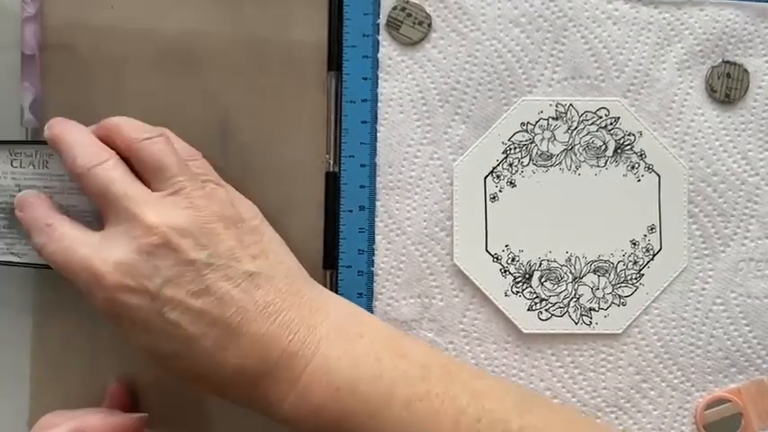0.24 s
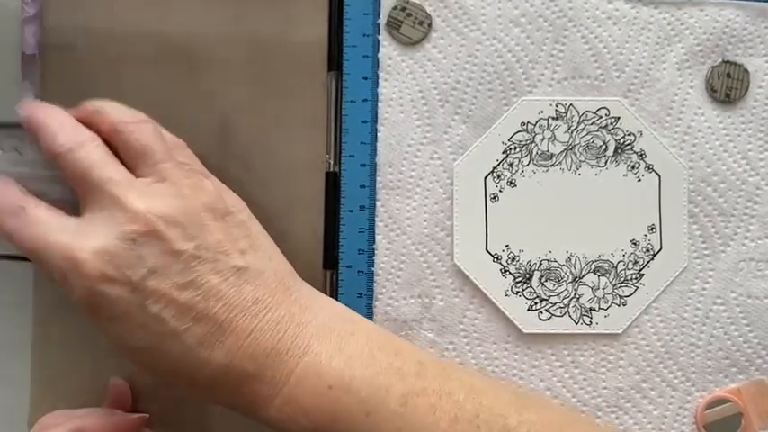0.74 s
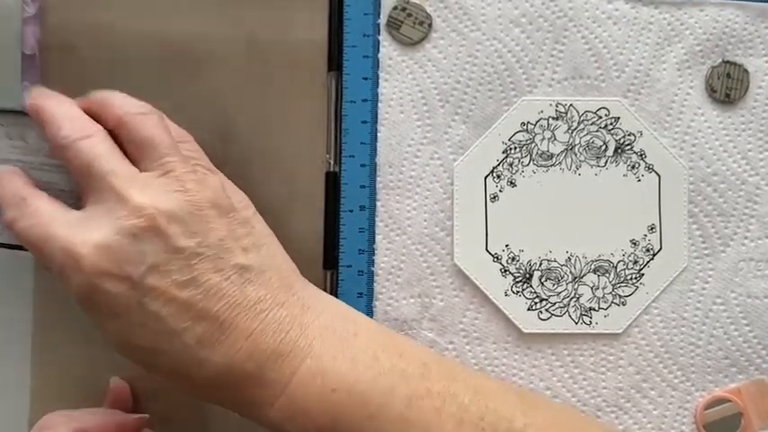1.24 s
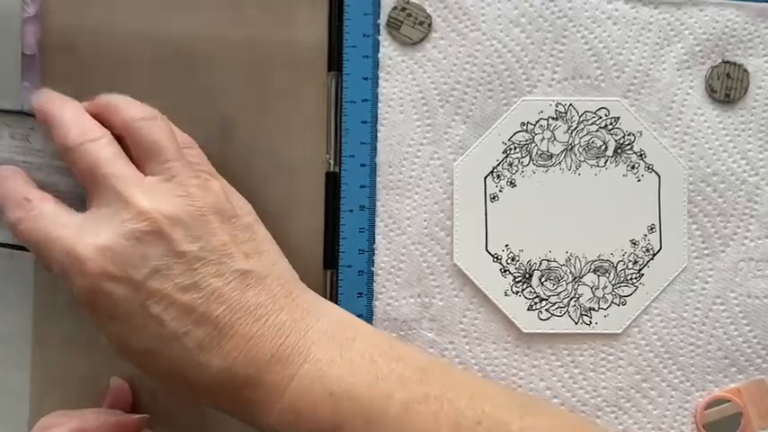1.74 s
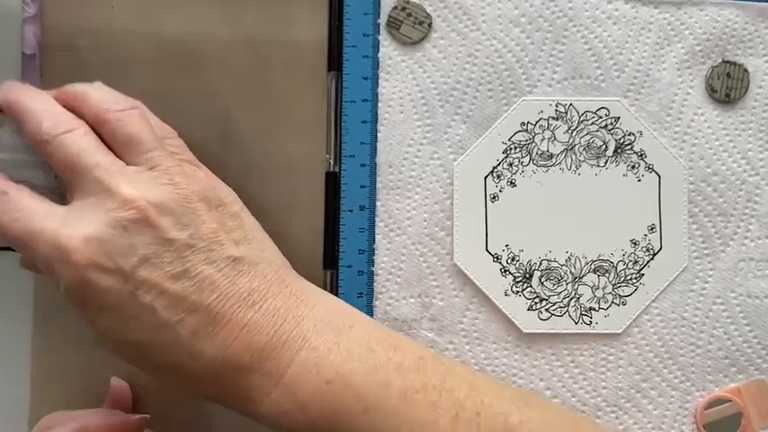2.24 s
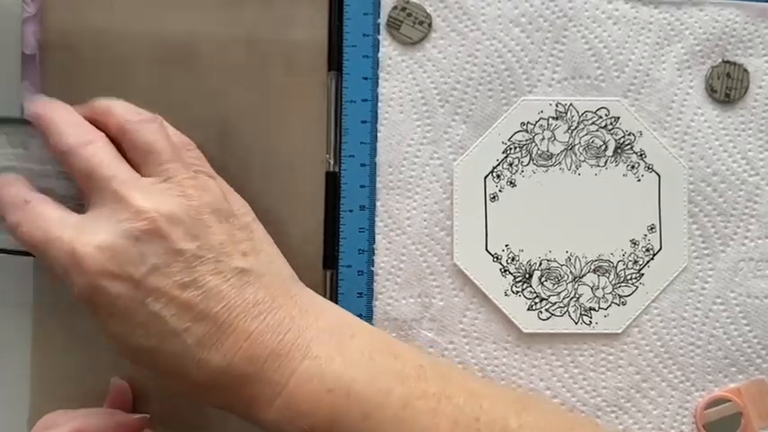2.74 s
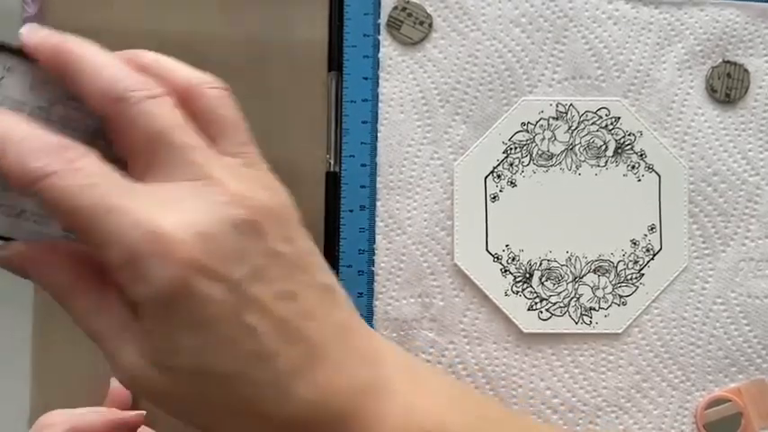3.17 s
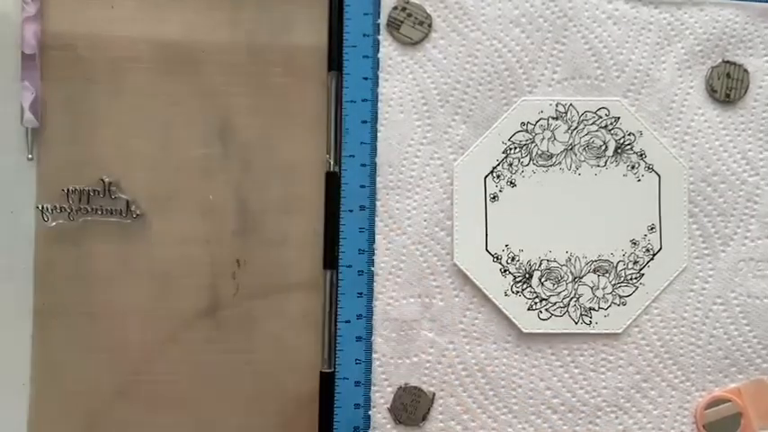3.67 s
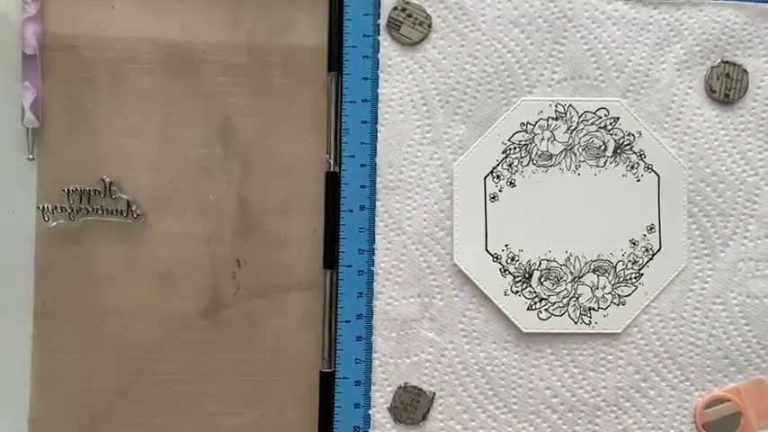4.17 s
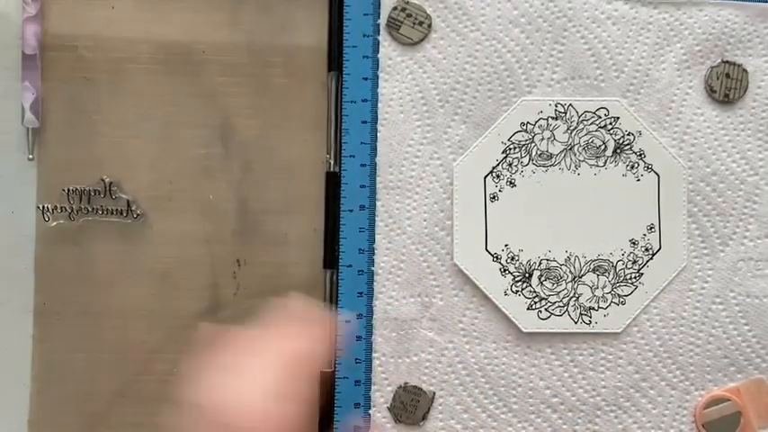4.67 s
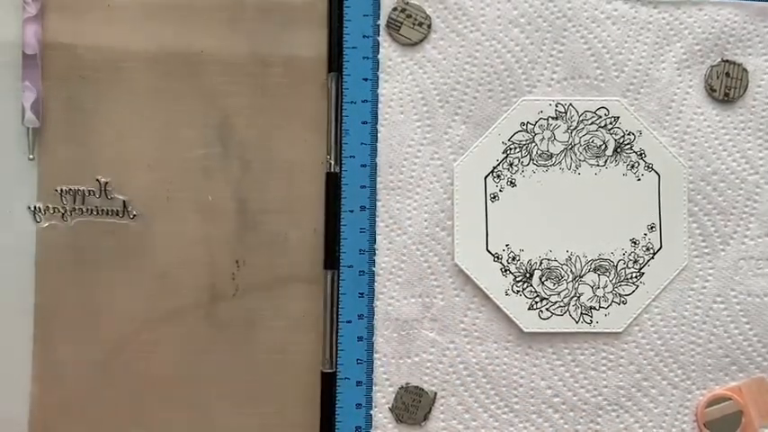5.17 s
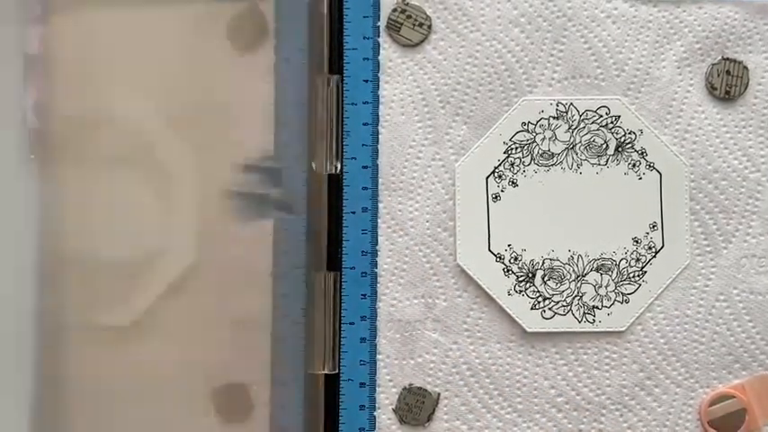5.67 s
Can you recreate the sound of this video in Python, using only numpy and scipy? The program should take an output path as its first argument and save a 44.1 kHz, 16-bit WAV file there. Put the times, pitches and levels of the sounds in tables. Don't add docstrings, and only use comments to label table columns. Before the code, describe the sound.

In a small quiet room, close above a table, an ink pad pats a stamp on an acrylic plate: six uneven pairs of dull, low thumps, usually stronger then weaker. Then a thin plastic case clicks, snaps shut and is set down. Finally the hinged plate takes two hard knocks, the second loudest, with a short creak between them and a dying rattle after.

```python
import sys
import numpy as np
from scipy import signal
from scipy.fft import rfft, irfft, next_fast_len
from scipy.io import wavfile
from scipy.ndimage import uniform_filter1d

SR = 44100
rng = np.random.default_rng(int(sys.argv[2]) if len(sys.argv) > 2 else 0)


def output_pcm(signal):
    pcm = np.clip(np.atleast_2d(signal).T, -1, 1) * 32767
    wavfile.write(sys.argv[1], SR, np.round(pcm).astype(np.int16))


def attenuation_scalar(level_db):
    decades = np.asarray(level_db, float) / 20
    return 10 ** decades


N = 260631
SIZE = 2 ** 14
LONG = next_fast_len(N)

# frequency_hz, level_db (per Hz)
TAP_COLOUR = [(48, -20), (100, 3), (168, 3.5), (210, 0), (296, -1), (450, -11), (572, -5.5), (910, -13),
              (1700, -11.5), (2300, -13.5), (3100, -19.5), (4300, -28), (6000, -33.5), (15500, -47)]
# frequency_hz, level_db, t60_s
TAP_MODES = [(100.05, 0.5, 0.63), (236.3, 6, 0.16), (293.96, 2.5, 0.15), (574.85, 10, 0.1062),
             (71.2, -2, 0.36), (1159.4, 4.5, 0.0624), (2366.5, 2, 0.09)]
# frequency_hz, t60_s
TAP_DECAY = [(60, 0.1383), (150, 0.032), (500, 0.267), (2000, 0.1957), (6000, 0.3), (14000, 0.03)]


def taps():
    # start_s, level_db, tilt_db (per octave)
    pad_hits = [(0.266, -22.5, 0.6), (0.48, -28, 0.06), (0.84, -26.5, 0.13), (1.041, -32, 0.45),
                (1.3496, -22.5, 1.02), (1.538, -35, -0.53), (1.848, -26, 0.5), (2.043, -31, 0.7),
                (2.374, -26, 0.51), (2.553, -32.5, 0.5853), (2.84, -25.5, 0.53), (3.027, -26.5, 0.5),
                (3.372, -51, 1.14)]
    damping = 0.8264
    out = np.zeros(N)
    same = rng.standard_normal(SIZE)
    for start_s, level_db, tilt_db in pad_hits:
        noise = same + 0.834 * rng.standard_normal(SIZE)
        hit = blow(noise, TAP_COLOUR, TAP_MODES, TAP_DECAY, tilt_db, damping,
                   direct_db=-11, direct_tilt_db=-3.5, modes_db=-6, lag=0.33)
        add(out, start_s, level_db, hit)
        touch = np.diff(rng.standard_normal(180)) * np.linspace(0, 1, num=179)
        add(out, start_s - 0.003, level_db - 26.5, touch)
    return out * attenuation_scalar(-3.0)


def thuds():
    # start_s, level_db
    nudged = [
        (3.838, -49),
        (3.938, -50),
        (4.44, -49.5),
    ]
    out = np.zeros(N)
    for start_s, level_db in nudged:
        hit = blow(rng.standard_normal(SIZE), TAP_COLOUR, TAP_MODES, TAP_DECAY, 2.48, 0.93,
                   direct_db=-14, direct_tilt_db=-0.88, modes_db=-37, lag=0.11)
        add(out, start_s, level_db, hit)
    return out * attenuation_scalar(-3.0)


def clacks():
    # start_s, level_db, decay_factor, lowest_ring_hz, top_db
    hard = [
        (3.838, -25.5, 0.96, 1641, 10),
        (3.939, -13, 1.182, 868.8, 5.5),
        (4.425, -30.5, 0.97, 992, -8),
        (4.435, -16.5, 1.054, 807.6, -7.5),
        (4.803, -38.5, .25, 1500, -11.5),
    ]
    # start_s, level_db, decay_factor, lowest_ring_hz, top_db
    soft = [(3.709, -31, 1.95, 1776, -20.5), (3.787, -43, 1.64, 1553, -36), (3.848, -30, 1.23, 2088, -40.5),
            (3.882, -30, 0.87, 1200, -11.5), (3.918, -36.5, 2.3, 1113, -4.5), (3.946, -22.5, 1.35, 767, -4),
            (4.136, -45, 2.88, 2130, -14), (4.257, -50, 2.1, 974, 14), (4.404, -48, 1.8, 935, 7),
            (4.443, -24.5, 2.1, 731, -3), (4.588, -61.5, 1.1, 2720, -11.5)]
    # tilt_db (per octave), slope_db (per octave squared)
    hard_tilt = (0.19, -5)
    soft_tilt = (-0.97, 0.49)
    # frequency_hz, level_db (per Hz)
    case_colour = [(150, -50), (250, 7), (360, -5), (421, -17.5), (475, 2.5), (857, 2), (984, 1),
                   (1840, -7.5), (2340, -8), (3040, -13), (3680, -8.5), (5120, -15.5), (6640, -22),
                   (12400, -30.5), (15800, -42)]
    # multiple, level_db, t60_s
    case_modes = [(1.01, 5.5, 0.061), (1.4, -11.5, 0.03), (2.3, -22, .02)]
    # frequency_hz, level_db, t60_s
    wall_rings = [(2740, -14.5, 0.052), (3634, -30, 0.043), (4156, -19, .05), (4833, -19, 0.045)]
    # frequency_hz, t60_s
    case_decay = [(300, 0.13), (1000, 0.041), (4000, 0.11), (5800, 0.27), (7000, .07), (14000, 0.087)]
    out = np.zeros(N)
    for contacts, direct_db, (base_db, slope_db) in ((hard, -8, hard_tilt), (soft, -25, soft_tilt)):
        for start_s, level_db, factor, ring_hz, top_db in contacts:
            tilt_db = base_db + slope_db * np.log2(ring_hz / 1000)
            modes = [(multiple * ring_hz, db, t60) for multiple, db, t60 in case_modes] + wall_rings
            hit = blow(rng.standard_normal(SIZE), case_colour, modes, case_decay, tilt_db, factor,
                       direct_db, direct_tilt_db=2.6, modes_db=-0.041, lag=0.031,
                       low_hz=0.838 * ring_hz, top_db=top_db)
            add(out, start_s, level_db, hit)
    return out * attenuation_scalar(-11)


def knocks():
    # start_s, level_db, tilt_db (per octave), decay_factor, direct_db
    blows = [
        (4.884, -8, 2.1643, 0.53, -6.5),
        (4.895, -14.5, -5, 0.27, -46.5),
        (5.149, -4, 3, 0.37, -7.5),
        (5.159, -7.5, -3, .5, -28.5),
        (5.176, -17, -0.5, .6, -39.5),
    ]
    # start_s, level_db
    rattle = [(5.05, -30), (5.066, -32.5), (5.218, -28), (5.249, -34.5), (5.287, -34), (5.327, -40),
              (5.359, -40), (5.392, -46), (5.43, -44.5), (5.467, -49), (5.489, -47), (5.543, -51),
              (5.627, -54), (5.719, -57)]
    # frequency_hz, level_db (per Hz)
    plate_colour = [(35, -55), (60, -35), (200, -17), (388, -1.5), (550, -10), (711, -2), (856, -14),
                    (1330, -14), (1570, -16.5), (1890, -20), (3810, -30.5), (5530, -30), (6670, -38),
                    (15800, -55.5)]
    # frequency_hz, level_db, t60_s
    edge_modes = [(285, -6, .08), (395, -5.5, 0.073), (677.7, 0.5, 0.067), (760, -4.5, 0.061),
                  (1340.6, -7, 0.088), (1810, -6, 0.03), (2540, -12, .02)]
    # frequency_hz, level_db, t60_s
    plate_modes = [(279.6, 1, .09), (403.4, 3, 0.033), (499, -3.5, 0.19), (677, -1.5, .06),
                   (725, 0.74, 0.15), (790, -5, 0.049), (982, -9, .06), (1383, -7, .07), (1780, -10.5, .05)]
    # frequency_hz, t60_s
    plate_decay = [(100, 0.17), (300, 0.19), (700, 0.1), (2000, 0.11), (5000, 0.077), (12000, 0.079)]
    chatter = [(start_s, level_db, -2.61, 0.99, -34) for start_s, level_db in rattle]
    groups = ((blows[:2], edge_modes, -7), (blows[2:], plate_modes, -9), (chatter, plate_modes, -22))
    out = np.zeros(N)
    for contacts, modes, top_db in groups:
        for start_s, level_db, tilt_db, factor, direct_db in contacts:
            hit = blow(rng.standard_normal(SIZE), plate_colour, modes, plate_decay, tilt_db, factor,
                       direct_db - 6, direct_tilt_db=-1.1, modes_db=0.6, lag=0.1326,
                       low_hz=220, top_db=top_db)
            add(out, start_s, level_db, hit)
    return out * attenuation_scalar(-6.0)


def cracks():
    # start_s, level_db, decay_factor
    contacts = [
        (4.8843, -18, 1.4),
        (5.1486, -2, 1.1),
    ]
    # frequency_hz, level_db, t60_s
    crack_rings = [(4030, -4.5, .002), (5340, 1.71, .0022), (8380, -7.5, 0.0017), (9600, -3, .0016),
                   (13400, -11, 0.0011)]
    out = np.zeros(N)
    t = np.arange(300) / SR
    for start_s, level_db, factor in contacts:
        rings = np.zeros(len(t))
        for k, (hz, db, t60) in enumerate(crack_rings):
            sign = (-1) ** k
            rings += sign * attenuation_scalar(db - 60 * t / (t60 * factor)) * np.sin(2 * np.pi * hz * t)
        add(out, start_s + 0.002, level_db, rings * (1 - np.exp(-t / 0.000091)))
    return out


def finger_slide():
    # peak_s, level_db, swell_s (per 20 dB), fade_s (per 20 dB)
    strokes = [(3.845, -55.5, 0.03, 0.0478), (4.0, -60, 0.2287, 0.15), (4.14, -58.5, 0.05, 0.0473),
               (4.262, -69, -0.13, 0.26), (4.47, -62.5, 0.0548, 0.1), (4.585, -56, 0.0776, 0.1045),
               (4.87, -69, -0.3, 0.05), (5.05, -63.5, 0.17, 0.046), (5.146, -48.5, 0.0574, 0.0723)]
    # frequency_hz, level_db (per Hz)
    rustle_colour = [(1290, -34), (2200, -4.5), (2790, -7), (3220, -7.5), (7400, -12.5), (8030, -15),
                     (11200, -16.5), (15800, -23)]
    grain = attenuation_scalar(2.8 * evened(uniform_filter1d(rng.standard_normal(N), size=300)))
    return evened(grain * coloured(rustle_colour)) * swells(strokes) * attenuation_scalar(-1.0)


def hinge_creak():
    # time_s, level_db
    creak = [(4.93, -73), (5.046, -42), (5.078, -49), (5.128, -40), (5.274, -43), (5.542, -61),
             (5.766, -75.5), (5.9, -105)]
    # frequency_hz, width_hz, level_db
    creak_peaks = [(131, 40, -5.5), (207.7, 60, -4.5), (267, 60, 1), (403, 59, -3.5), (744.5, 41, -8.5),
                   (1100, 200, -9), (1500, 500, -13)]
    # start_s, level_db, pitch_hz, length_s
    slips = [(4.96, -36.5, 710, 0.0262), (5.018, -31.5, 718.6, 0.0215), (5.037, -33, 707.8, 0.0179),
             (5.071, -46, 723.7, 0.049), (5.123, -29, 730, 0.022)]
    uneven = attenuation_scalar(2.5 * evened(uniform_filter1d(rng.standard_normal(N), size=900)))
    rubbing = sum(attenuation_scalar(db) * fuzzy(hz, width_hz) for hz, width_hz, db in creak_peaks)
    out = evened(uneven * rubbing) * curve(creak) * attenuation_scalar(-2.5)
    for start_s, level_db, pitch_hz, length_s in slips:
        count = len(np.arange(0, length_s, 1 / SR))
        waver = 1 + 0.12 * evened(uniform_filter1d(rng.standard_normal(4000), size=120))[:count]
        tone = np.sin(2 * np.pi * np.cumsum(pitch_hz * waver) / SR)
        add(out, start_s, level_db, tone * signal.windows.tukey(count, 0.6))
    return out


def room(x):
    # frequency_hz, t60_s
    room_decay = [(100, 0.24), (400, 0.23), (1000, 0.27), (3000, 0.32), (8000, .23), (15000, 0.22)]
    tail = dying(rng.standard_normal(SIZE), room_decay, 1, 0)
    tail *= 1 - np.exp(-np.arange(SIZE) / SR / 0.004)
    tail = signal.lfilter(*signal.butter(1, 220, "high", fs=SR), tail)
    return attenuation_scalar(-8.5) * signal.fftconvolve(x, tail)[:N]


def table():
    # peak_s, rumble_db (from the arm), ringing_db (from the taps), swell_s (per 20 dB),
    # fade_s (per 20 dB)
    jolts = [(0.0, -50.5, -63.5, .1, -0.5326), (.5, -62.5, -50.5, 0.0338, 0.1372),
             (.61, -44, -61.5, 0.0155, -0.0043), (.83, -52, -58, .5, 0.2659), (3.2, -71.5, -72.5, 10, 0.21)]
    ring_hz = (234, 289)
    t = np.arange(N) / SR
    rings = sum(np.sin(2 * np.pi * hz * t) * attenuation_scalar(db) for hz, db in zip(ring_hz, (1.5, -4)))
    rumble = fuzzy(60, 50)
    return rumble * swells(jolts) + rings * swells(jolts, column=2)


def air():
    # frequency_hz, level_db (per Hz)
    air_colour = [(24, -30), (40, -13.5), (79, -10), (234, -8.5), (313, -9), (346, -10), (512, -9.5),
                  (565, -9), (654, -6.5), (704, -18), (1120, -10.5), (1360, -15), (1620, -14.5),
                  (2990, -32), (14000, -42.5)]
    # frequency_hz, level_db
    hum = [(662, -83), (1653, -87)]
    lines = sum(attenuation_scalar(db) * fuzzy(hz, 25) for hz, db in hum)
    return attenuation_scalar(-67.5) * coloured(air_colour) + lines


def blow(noise, colour, modes, t60s, tilt_db, factor, direct_db, direct_tilt_db, modes_db, lag,
         low_hz=20, top_db=0):
    hz = np.fft.rfftfreq(SIZE, 1 / SR)
    t = np.arange(SIZE // 2) / SR
    octaves = np.log2((hz + 50) / 1000)
    shape_db = read(colour, hz) + tilt_db * octaves
    shape_db += top_db / (1 + (4800 / (hz + 1)) ** 6)
    shape_db -= 10 * np.log10(1 + (low_hz / (hz + 1)) ** 6)
    shape = causal(shape_db)
    travel = np.exp(-2j * np.pi * np.cumsum(lateness(hz, lag)) * hz[1])
    early = np.exp(-2j * np.pi * np.cumsum(lateness(hz, 0.3977 * lag)) * hz[1])
    direct = attenuation_scalar(direct_db + direct_tilt_db * octaves) * travel
    dense = shape * (direct + early * rfft(dying(noise, t60s, factor, 0.5 * lag)))
    ringing = sum(attenuation_scalar(db - 60 * t / (t60 * factor)) * np.sin(2 * np.pi * f * t) for f, db, t60 in modes)
    strong = rfft(ringing, SIZE)
    strong = early * strong / np.linalg.norm(strong) / (1 - 1j * low_hz / (hz + 1)) ** 2
    both = dense / np.linalg.norm(dense) + attenuation_scalar(modes_db) * strong
    sound = np.roll(irfft(both, SIZE), round(0.002 * SR))
    sound *= signal.windows.tukey(2 * SIZE)[SIZE:]
    return sound / np.sqrt(uniform_filter1d(sound[:4000] ** 2, size=200).max())


def lateness(hz, lag):
    return lag * np.maximum(1 / np.sqrt(hz + 30) - 1 / np.sqrt(5000), 0)


def dying(noise, t60s, factor, lag):
    hz, t, z = signal.stft(noise, SR, nperseg=128)
    fall = attenuation_scalar(-60 * t / (factor * read(t60s, hz)[:, None] + 0.001))
    fall *= 1 - np.exp(-(t + 0.0026) / (lateness(hz, lag)[:, None] + 0.00017))
    fall /= np.linalg.norm(fall, axis=1, keepdims=True)
    out = signal.istft(z * fall, SR, nperseg=128)[1][:len(noise)]
    return out / np.linalg.norm(out)


def causal(db):
    cepstrum = irfft(np.maximum(db, -120) * np.log(10) / 20, SIZE)
    cepstrum[1:SIZE // 2] *= 2
    cepstrum[SIZE // 2 + 1:] = 0
    return np.exp(rfft(cepstrum))


def coloured(points):
    gain = attenuation_scalar(read(points, np.fft.rfftfreq(LONG, 1 / SR)))
    return evened(irfft(rfft(rng.standard_normal(LONG)) * gain, LONG)[:N])


def fuzzy(hz, width):
    f = np.fft.rfftfreq(LONG, 1 / SR)
    peak = 1 + (2 * (f - hz) / width) ** 2
    return evened(irfft(rfft(rng.standard_normal(LONG)) / peak, LONG)[:N])


def swells(rows, column=1):
    t = np.arange(N) / SR
    gain = np.zeros(N)
    for row in rows:
        peak_s, swell_s, fade_s = row[0], abs(row[-2]), abs(row[-1])
        gain += attenuation_scalar(row[column] - 20 * np.maximum((peak_s - t) / swell_s, (t - peak_s) / fade_s))
    return gain


def curve(rows, column=1):
    rows = np.array(rows)
    return attenuation_scalar(np.interp(np.arange(N) / SR, rows[:, 0], rows[:, column], -160, -160))


def read(points, hz):
    f, value = np.transpose(points)
    return np.interp(np.log(hz + 1), np.log(f + 1), value)


def evened(x):
    return x / np.sqrt(np.mean(x ** 2) + 1e-20)


def add(mix, start_s, level_db, sound):
    part = mix[round((start_s - 0.002) * SR):][:len(sound)]
    part += attenuation_scalar(level_db) * sound[:len(part)]


def scene():
    near = taps() + thuds() + clacks() + knocks() + cracks() + finger_slide() + hinge_creak()
    return (near + room(near) + table() + air())[None]


def roll_off(x):
    return signal.sosfilt(signal.butter(12, 16970, fs=SR, output="sos"), x)


def record(dry):
    band = signal.sosfilt(signal.butter(6, 50, "high", fs=SR, output="sos"), dry)
    band = signal.oaconvolve(band, signal.firwin(255, 15800, fs=SR)[None], "same")
    return roll_off(band)


dry = scene()
out = record(dry)
output_pcm(out)
```